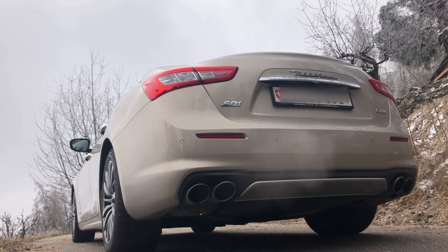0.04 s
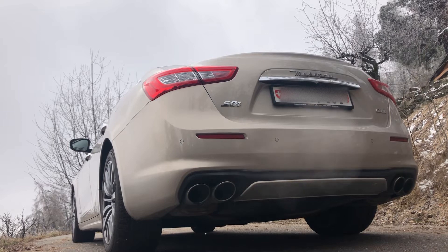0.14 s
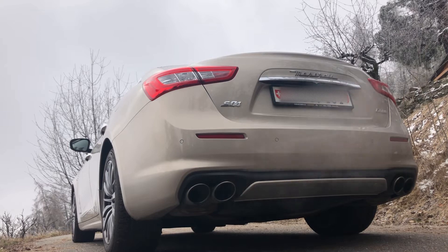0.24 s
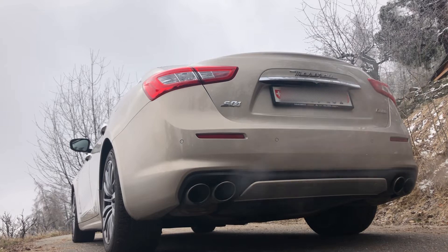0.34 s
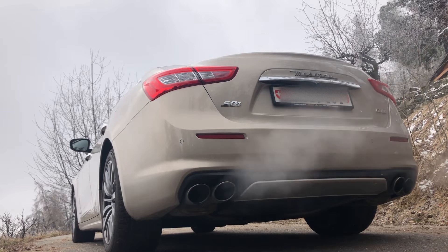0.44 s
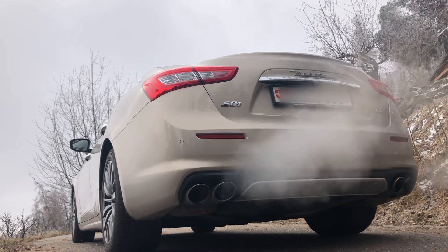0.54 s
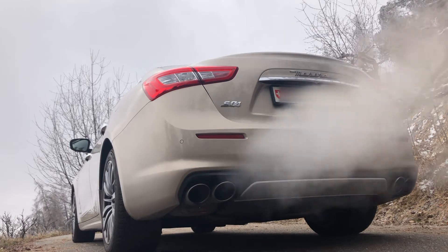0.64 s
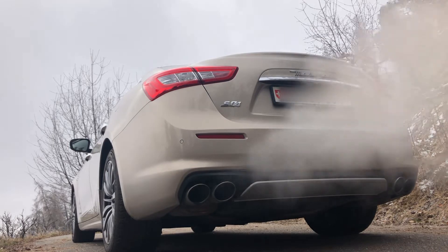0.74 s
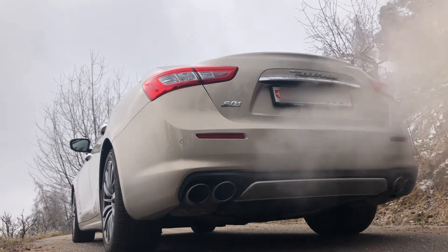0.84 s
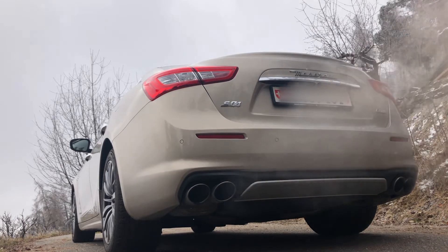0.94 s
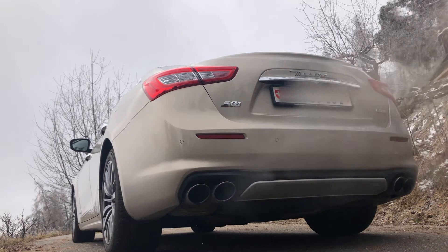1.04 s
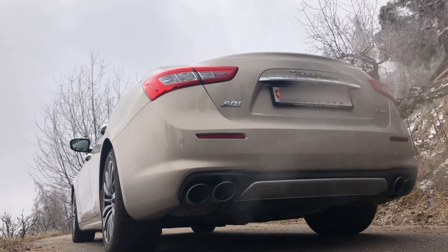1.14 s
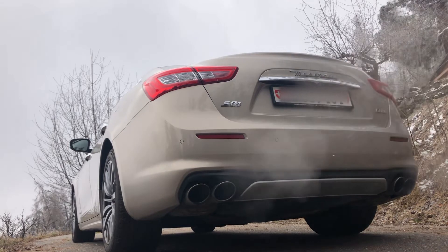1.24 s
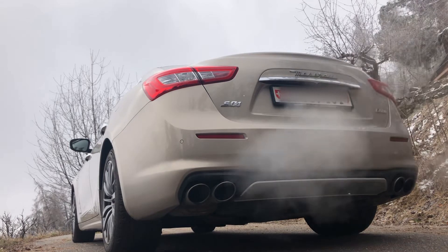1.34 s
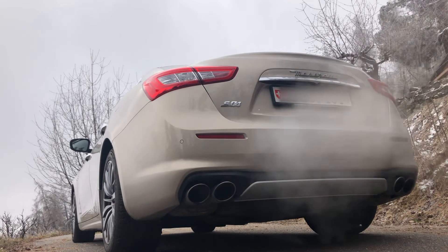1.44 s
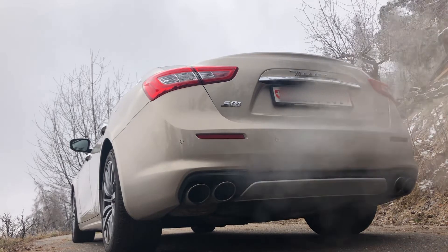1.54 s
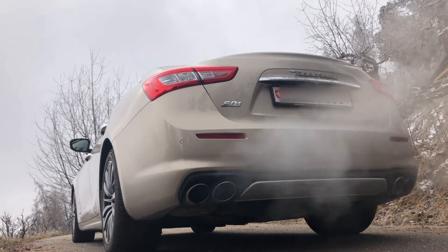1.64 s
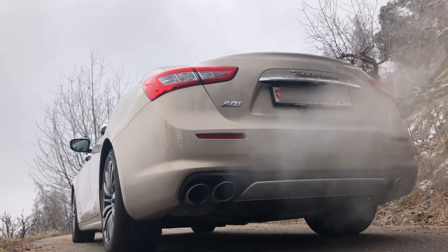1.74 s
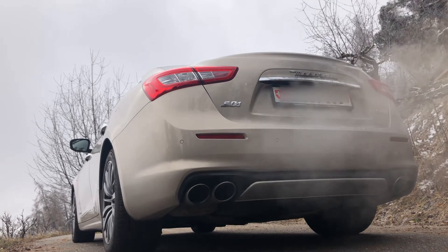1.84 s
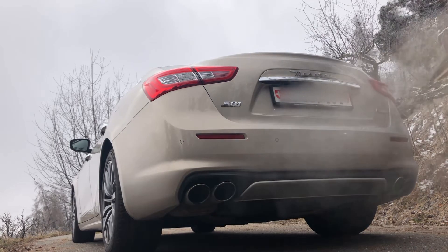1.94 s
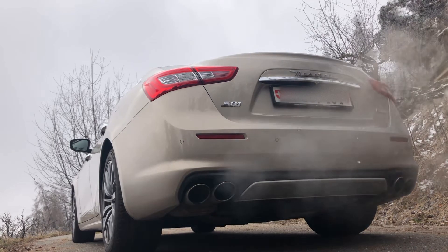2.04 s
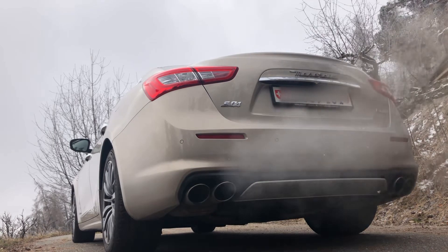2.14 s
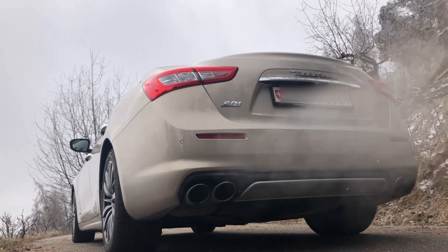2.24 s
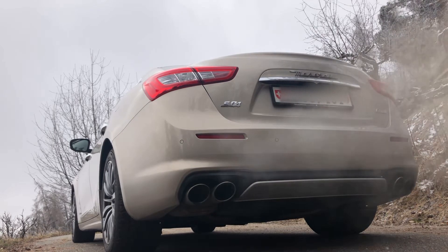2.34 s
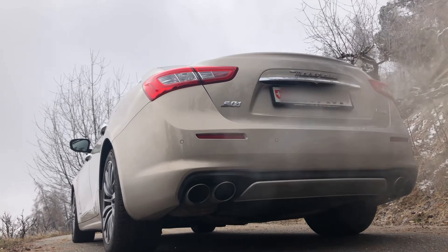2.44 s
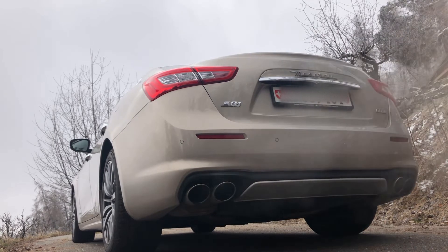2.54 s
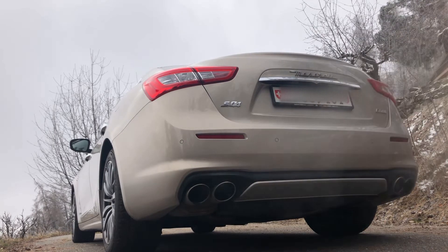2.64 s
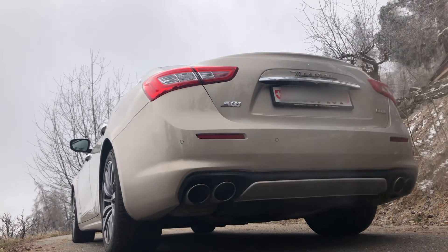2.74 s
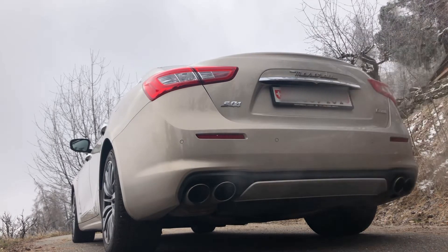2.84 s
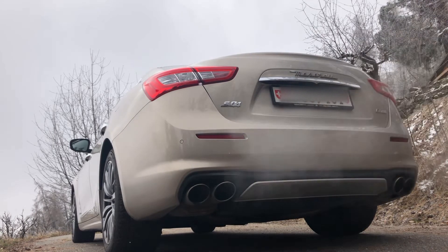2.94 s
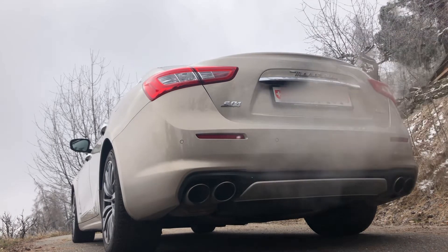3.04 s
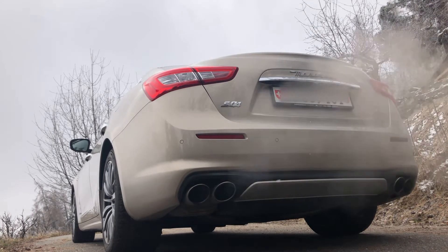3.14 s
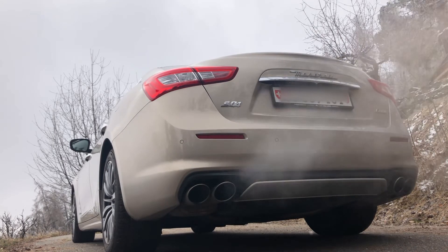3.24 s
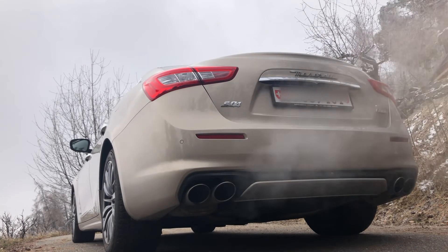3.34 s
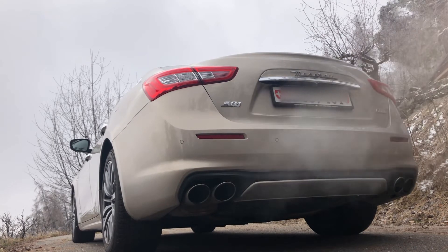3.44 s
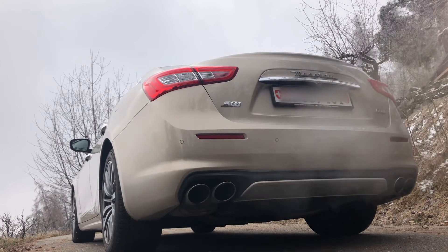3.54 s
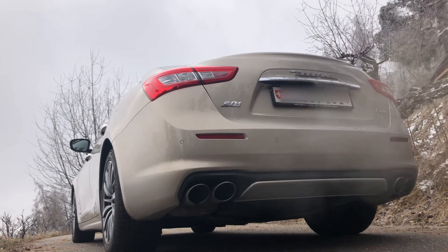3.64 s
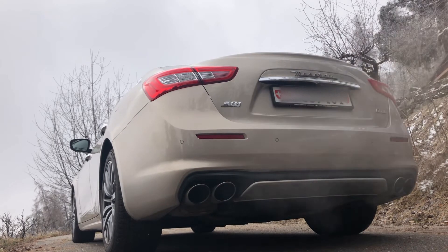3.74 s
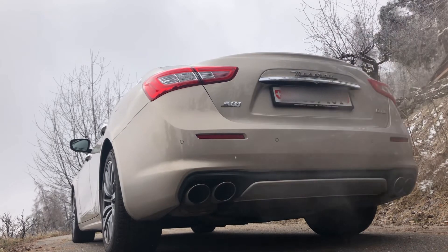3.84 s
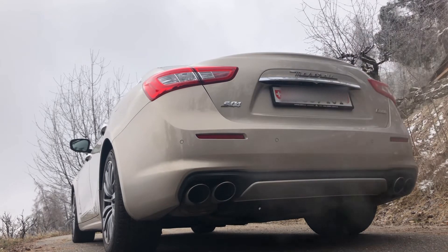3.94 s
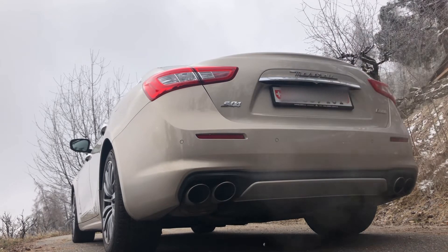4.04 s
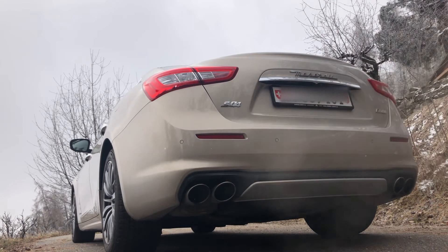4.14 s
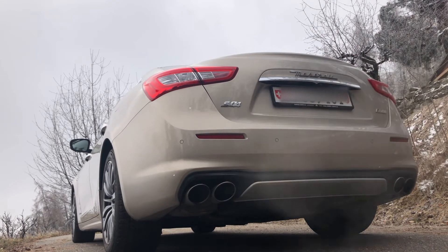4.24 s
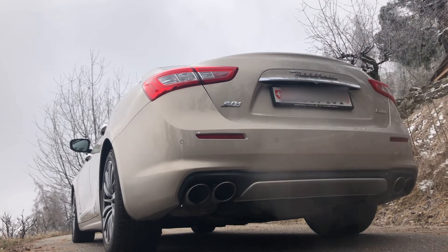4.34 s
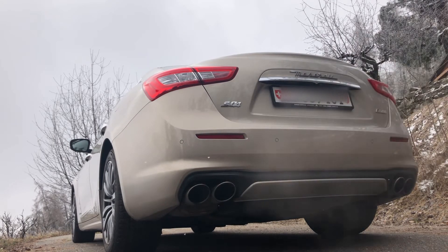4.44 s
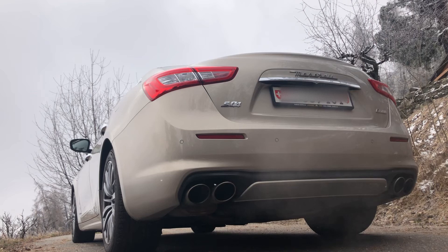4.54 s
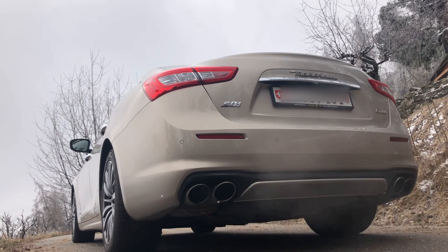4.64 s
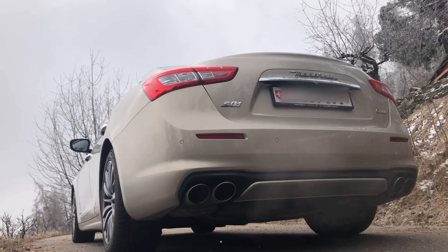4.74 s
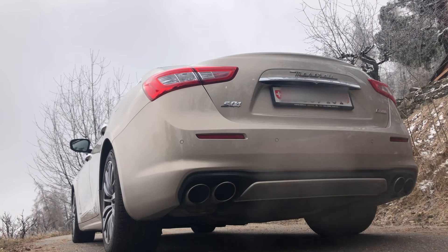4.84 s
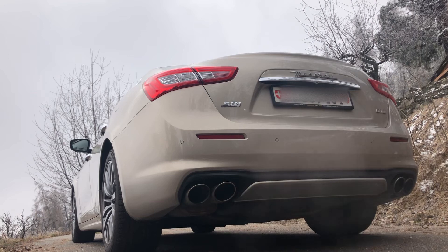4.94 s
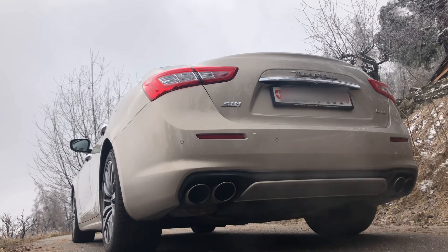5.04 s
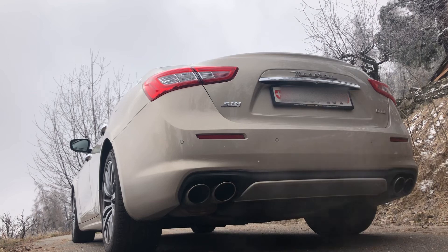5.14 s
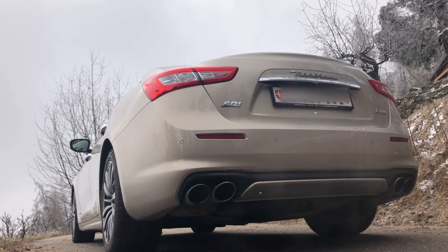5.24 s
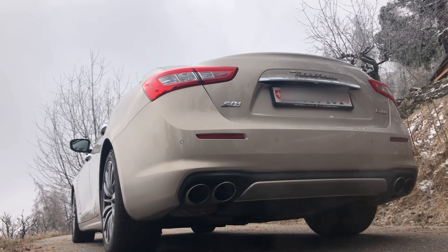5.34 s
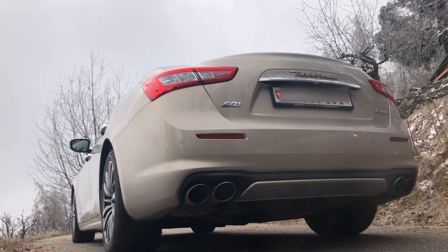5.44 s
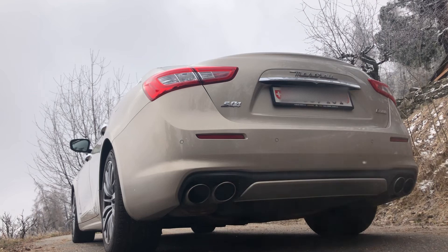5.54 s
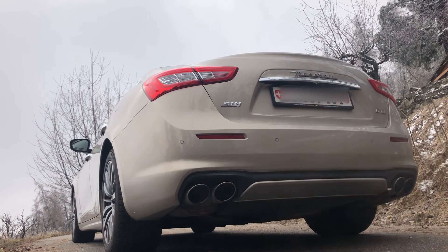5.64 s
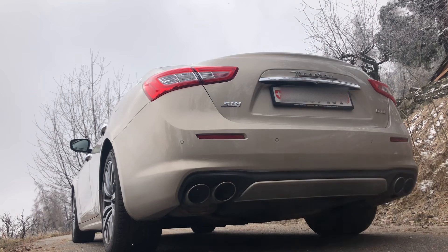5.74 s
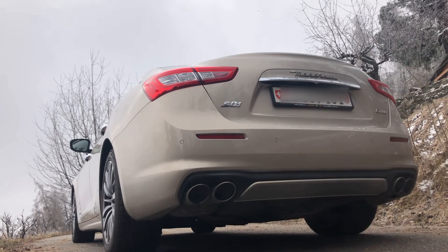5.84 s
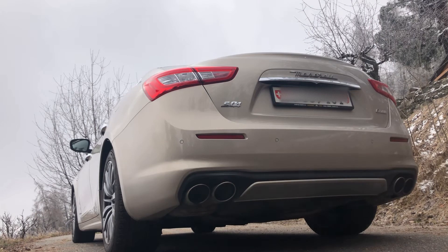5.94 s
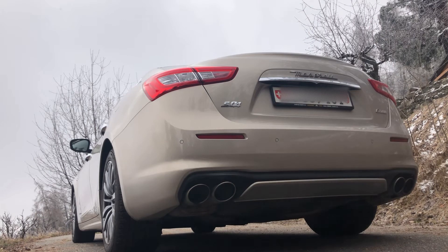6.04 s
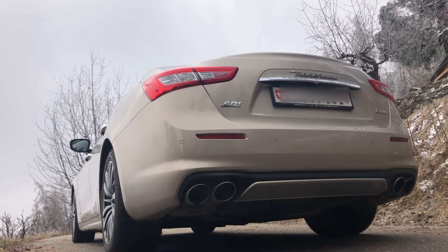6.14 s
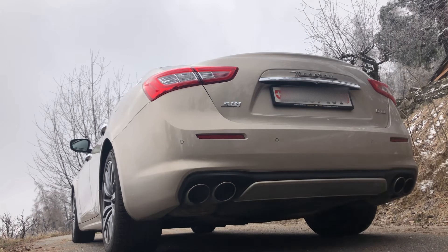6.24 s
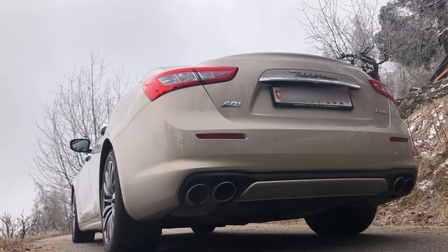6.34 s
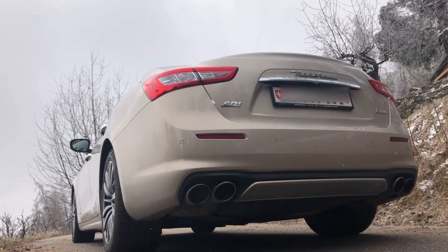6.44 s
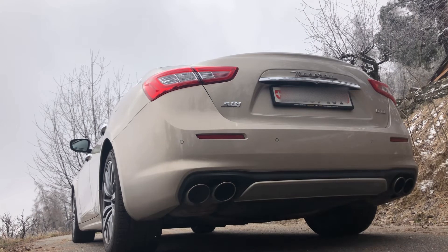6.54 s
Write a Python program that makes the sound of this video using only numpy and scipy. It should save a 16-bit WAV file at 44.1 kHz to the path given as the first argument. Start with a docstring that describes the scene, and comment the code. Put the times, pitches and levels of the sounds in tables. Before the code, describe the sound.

A sports car revs hard four times with crackling exhaust pops, then winds down slowly and settles into a deep idle.

```python
"""On an open road, microphone just behind the tailpipes of a V6 sports car.
Four blips of the throttle, a long run-down, then idle. Cylinder pulses ring the exhaust; under load
the pipe wave steepens into crackling shocks. Each lift-off pops, and the first three also stutter
with misfires. With the fuel cut the engine only pumps air and burbles, until it catches again with
a deep boom. The turbo whistles behind the exhaust, and the roadside sends back a short, dull echo."""
import sys
import numpy as np
from scipy import signal
from scipy.fft import rfft, irfft
from scipy.io import wavfile
from scipy.ndimage import uniform_filter1d

SR = 44100
rng = np.random.default_rng(int(sys.argv[2]) if len(sys.argv) > 2 else 0)


def write(x):
    x = np.atleast_2d(x).T
    wavfile.write(sys.argv[1], SR, np.round(np.clip(x, -1, 1) * 32767).astype(np.int16))


N = 291060
T = np.arange(N) / SR

# Levels in the tables are relative. Engine speed in Hz counts four-stroke cycles a second.
# Throttle blips. Each row: opening and shutting in seconds, starting speed in Hz, exponential growth
# per second, top speed in Hz, strain at the top from 0 to 1, extra level of the coast after it in dB.
BLIPS = [(-.2, 0.674, 14.62, 1.494, 38.93, 0.5, 3), (1.129, 1.66, 31.46, 1.05, 42.37, 0.79, 2),
         (1.957, 2.406, 37.03, .901, 42.38, 1, -0.5), (2.792, 3.228, 36, 1.07, 42.57, 0.92, 0)]
# The engine runs down and catches at idle. Each row: time in seconds, speed in Hz.
RUN_DOWN = [(3.6, 36.56), (4.0, 30.88), (4.5, 24.9), (5.0, 19.67), (5.4, 15.77), (5.7, 12.63),
            (5.87, 10.45), (5.95, 11.55), (6.15, 11.2), (6.7, 12.42)]
# Cylinders in firing order, banks alternating.
# Each row: burning level in dB, burning lag in ms, pumping level in dB, pumping lag in ms.
CYLINDERS = [(-3, 0.35, 9, -0.27), (0, 0.17, 3, 0.53), (-1.5, 0.37, 3.1, -0.019), (0, 0.032, 7.5, -0.51),
             (-2, .15, 10.5, -0.47), (2, 0.053, -5.5, 0.5)]
# The turbo's whistle. Each row: time in seconds, pitch in Hz, level in dB.
TURBO_GLIDE = [(0, 6400, -42), (.15, 5600, -37), (.3, 5200, -32.5), (.5, 5250, -27.5), (.75, 5300, -52),
               (3.3, 7100, -67), (3.8, 6700, -52.5), (4.25, 5350, -53.5), (4.6, 5200, -57), (5, 4800, -78)]
# Slugs of gas as the throttle opens or shuts. Each row: start in seconds, level in dB, rise in seconds.
GAS_SLUGS = [(0.663, -8.5, 0.022), (1.12, -21.5, 0.033), (1.532, -17, 0.047), (1.576, -18, 0.033),
             (1.674, -23, 0.02), (1.961, -24, 0.021), (2.264, -13.5, 0.048), (2.403, -23, 0.031),
             (2.8, -27, .032), (3.224, -17, 0.027)]
# How strongly the pipes boom. Each row: engine speed in Hz, level at the rate of one bank in dB,
# level at the firing rate in dB when coasting, the same when burning.
BOOM_LEVELS = [(10.91, -54, -13, -15), (11.9, -48, -16, -10.5), (14, -36, -20, -7), (16.02, -21, -19, 8),
               (19.8, -32, -26.5, -25.5), (25.7, -39.5, -52, -19.5), (29, -47.5, -45, -32),
               (41.7, -56, -82, -47)]
# Unburnt fuel going off in the pipe. Each row: time in seconds, crack level in dB, thud level in dB.
FUEL_POPS = [(.621, 0, -22), (0.6443, -2.5, -12), (0.6713, -3.5, 1), (1.5604, -3.5, 2), (1.5793, -1, -3),
             (1.5992, -3.5, 1.5), (1.956, -16, -6.5), (2.0087, -5.5, -22), (2.034, -4.5, -14),
             (2.2719, -0.5, -0.5), (2.2988, -3, -6), (2.323, -1.5, -2), (2.37, -4, -2.5),
             (2.4132, -9, -8.5), (2.4168, -7.5, -3.5), (2.8361, -8.5, -20), (2.8802, -8.5, -29),
             (3.0514, -9, -17), (3.1458, 0, 0.5), (3.1932, -8.5, -7), (3.2294, -16, -2.5)]
# Firings that fail. Each row: centre in seconds, half length in seconds, dip in dB.
MISFIRES = [(.655, 0.002, -13), (0.671, 0.0042, -18), (1.552, 0.0069, -15.5), (2.265, 0.008, -15),
            (2.287, 0.0039, -21), (2.347, 0.0079, -12), (2.4, .007, -23)]
# Hard firings, one a cycle as the idle takes hold. Each row: time in seconds, boost in dB.
HARD_FIRINGS = [(6.183, 5.5), (6.271, 4.5), (6.359, 6)]
# Reflections inside the silencer. Each row: delay in seconds, share of the pulse.
BAFFLE_ECHOES = [(.0029, 0.16), (.0057, 0.11), (.0086, 0.28)]

# Resonances and broad peaks of the exhaust. Each row: centre in Hz, width in Hz, level in dB.
PIPE_MODES = [(66.2, 37, -11.5), (93.5, 50, -12), (148.2, 47, -8.5), (250.6, 58, -16), (350.1, 36, 0.9),
              (430, 66, -2), (519, 85, 3.5), (569, 82, 1), (642, 60.8, 3.5), (700, 59, -4)]  # pipes and silencer
BARK_BAND = [(674.4, 150, 2.5)]  # the band that hard pulses stress
TAILPIPE_MODES = [(1091, 259, -6), (1126, 98, -2.5), (1453, 69, -1.1), (1584, 152, -3), (2052, 177, -13.5),
                  (2340, 575, -23.5)]
OUTLET_MODES = [(3080, 226, -5), (3350, 88, -8.5), (3653, 130, -9.5), (4260, 430, -11), (4640, 200, -2.5),
                (5220, 250, -6.5), (5830, 590, -15.5)]  # cross modes of the outlets
HISS_PEAKS = [(3147, 236, 0.5), (4080, 450, -3), (5150, 970, 1), (6080, 950, -5)]  # rushing gas
FIZZ_PEAKS = [(8180, 3200, 15), (10630, 2200, 15.7), (15100, 2500, 10.3)]  # its highest treble

# Pipe tone, rasp, crackle and fizz with the throttle open. Each row: level at the reference speed in dB,
# slope in dB per Hz of speed, change at full strain in dB, change just after opening in dB.
THROTTLE_LEVELS = [(-11, 0, -1.5, -2), (-17.5, 0.09, -2.5, -4), (-27, 0.35, 8.5, -13), (-43.5, 0, 26, -14)]
# The same four layers at idle. Each row: level as the fuel returns in dB, level once settled in dB.
IDLE_LEVELS = [(-22, -12.5), (-44.5, -28.5), (-53, -37.5), (-60, -46.5)]
# Pipe tone, rasp, hiss and fizz with the fuel cut.
# Each row: level at high speed in dB, level at low speed in dB, boost in the late rush of air in dB.
COAST_LEVELS = [(-23, -28, 3.5), (-37, -39.5, 3), (-45.5, -51, 6), (-53.5, -61.5, 11.5)]

TORQUE_LAG_S, LIFT_LEAD_S, FLYWHEEL_S = .04, .021, .118
CATCH_S, SETTLE_S = 5.905, .63  # fuel returns, and the idle builds up to full strength
PRESSURE_S = .063  # the treble waits for pressure to build in the pipes
STRAIN_KNEE_HZ, STRAIN_FADE_S = 1.1, .17  # strain sets in this close to top speed, then eases
ROAR_HZ, ROAR_WIDTH_HZ, ROAR_DB = 37.5, 3, 2  # the pipes resonate best at this engine speed
CLIMB_LOAD, IDLE_LOAD = 3.3, .9  # load hardens the pulses; it is greatest pulling up from low speed
COAST_HIGH_HZ, COAST_LOW_HZ = 28.27, 18.8  # the flow dies down between these speeds
RUSH_S, RUSH_WIDTH_S = 5.473, .21  # a rush of air swells once, late in the run-down
NULL_HZ, NULL_WIDTH_HZ = 15.8, .74  # at this speed the firing-rate boom cancels and flips sign


def undb(db):
    """Decibels to gain."""
    return 10 ** (np.asarray(db) / 20)


def bell(x, centre, width):
    """A rounded hump of height 1."""
    return np.exp(-((x - centre) / width) ** 2)


def curves(table, at):
    """A table's later columns, joined by straight lines along its first."""
    knots, *columns = np.transpose(table)
    return [np.interp(at, knots, column) for column in columns]


def noise():
    """White noise of unit power."""
    return rng.standard_normal(N)


def smooth(x, seconds):
    """Rounded moving average."""
    size = max(int(seconds * SR), 1)
    return uniform_filter1d(uniform_filter1d(x, size), size)


def decay(x, seconds):
    """Gives every impulse an exponential tail."""
    return signal.lfilter([1], [1, -np.exp(-1 / (seconds * SR))], x)


def steady(x):
    """Unit power over a few engine cycles; single pulses keep their relative size."""
    return x / np.sqrt(np.abs(smooth(x * x, seconds=.06)) + 1e-14)


def ring(x, modes, size=8192):
    """Causal filter with steep-sided resonances."""
    f = np.arange(size // 2 + 1) * SR / size
    power = sum((undb(db) / (1 + ((f - hz) / width) ** 2) ** 1.5) ** 2 for hz, width, db in modes)
    cepstrum = irfft(np.log(power) / 2)
    cepstrum[1:size // 2] *= 2  # minimum phase: the ringing follows the pulse
    cepstrum[size // 2 + 1:] = 0
    response = irfft(np.exp(rfft(cepstrum)))
    return signal.fftconvolve(x, response)[:N]


def clicks(times, sizes):
    """Impulses, each shared between two neighbouring samples."""
    at = np.clip(times * SR, 0, N - 2)
    i = at.astype(int)
    return np.bincount(i, sizes * (1 - at + i), N) + np.bincount(i + 1, sizes * (at - i), N)


def roadside(x, wet_db=-19, t60=.46):
    """Farther off, the earth bank and trees scatter a short, dull echo back to the microphone."""
    age = T[:SR // 2]
    dull = signal.lfilter(*signal.butter(1, 3000, fs=SR), rng.standard_normal(len(age)))
    tail = dull * undb(-60 * age / t60) * (age > .008)
    return x + undb(wet_db) * signal.fftconvolve(x, tail / np.linalg.norm(tail))[:N]


def turbo(width_hz=700):
    """Behind the exhaust, the turbine's breathy whistle glides with its speed."""
    hz, db = curves(TURBO_GLIDE, T)
    waver = steady(smooth(noise(), 1 / width_hz))
    return undb(db) * np.sqrt(2) * waver * np.cos(2 * np.pi * np.cumsum(hz) / SR)


def thumps(thump_hz=58, flutter_db=-5, trim_db=-7.5):
    """A slug of gas rocks the silencer at its lowest mode, with a low flutter."""
    flutter = undb(flutter_db) * steady(ring(noise(), [(75, 29, 13), (140, 41, -27)]))
    out = np.zeros(N)
    for start, db, rise in GAS_SLUGS:
        age = np.maximum(T - start, 0)
        swell = age / rise * np.exp(1 - age / rise)
        out += undb(db + trim_db) * swell * (np.sin(2 * np.pi * thump_hz * age) + flutter)
    return out


def boom(turn, speed, burn, lead_rad=.43, overtone_db=-6, overtone_lead_rad=1.555, idle_hz=13.5):
    """The gas flow swells just before each pulse, most at low speed; idle firings sharpen its crest."""
    bank_db, coasting_db, burning_db = curves(BOOM_LEVELS, speed)
    null = np.tanh((NULL_HZ - speed) / NULL_WIDTH_HZ)
    firing = undb(burn * burning_db + (1 - burn) * coasting_db) * null
    angle = 2 * np.pi * len(CYLINDERS) * turn
    idle = smooth(burn * (speed < idle_hz), seconds=.098)
    crest = np.cos(angle + lead_rad) + idle * undb(overtone_db) * np.cos(2 * angle + overtone_lead_rad)
    return np.sqrt(2) * (undb(bank_db) * np.cos(angle / 2) + firing * crest)


def pops():
    """Unburnt fuel goes off: a crack at the outlets, right by the microphone, and a thud in the pipe."""
    times, crack_db, thud_db = np.transpose(FUEL_POPS)
    snap = clicks(times, -undb(crack_db))
    crack = snap + undb(-13) * decay(snap, seconds=.0022) * noise()
    thud = ring(clicks(times, -undb(thud_db)), PIPE_MODES)
    return (undb(21) * ring(crack, OUTLET_MODES) + undb(26.5) * ring(crack, TAILPIPE_MODES)
            + undb(-22.5) * ring(crack, FIZZ_PEAKS) + undb(33) * thud)


def reaches_top(opens, start, growth, top):
    """The moment at which a blip arrives at its top speed."""
    return opens + TORQUE_LAG_S + np.log(top / start) / growth


def engine_speed(points=8):
    """Each blip climbs exponentially and holds; friction slows it and the flywheel rounds the corners."""
    corners = []
    for opens, shuts, start, growth, top, _, _ in BLIPS:
        times = np.linspace(opens + TORQUE_LAG_S, reaches_top(opens, start, growth, top), points)
        corners += [*zip(times, np.geomspace(start, top, points)), (shuts - LIFT_LEAD_S, top)]
    padded_time = np.arange(-SR, N + SR) / SR
    speed = np.interp(padded_time, *np.transpose(corners + RUN_DOWN))
    return smooth(speed, FLYWHEEL_S)[SR:SR + N]


def fuel():
    """1 while fuel burns, 0 while it is cut."""
    on = sum((T > opens) & (T < shuts) for opens, shuts, *_ in BLIPS) + (T > CATCH_S)
    return smooth(1. * on, seconds=.018)


def valve_pulses(turn, pattern_db, lag_ms, uneven, scatter_db, jitter_ms):
    """A pulse as each exhaust valve opens; every cylinder has its own size and delay."""
    count = len(CYLINDERS)
    i = np.flatnonzero(np.diff(np.floor(turn * count)))
    cylinder = np.arange(len(i)) % count
    chance = rng.standard_normal((len(i), 2))
    late = (lag_ms[cylinder] + jitter_ms * chance[:, 0]) / 1000
    uneven, scatter_db = (np.broadcast_to(c, N)[i] for c in (uneven, scatter_db))
    sizes = undb(uneven * pattern_db[cylinder] + scatter_db * chance[:, 1])
    return steady(clicks(T[i] + late, -sizes))


def puffs(pulses, seconds):
    """Turbulence that follows each pulse and dies away."""
    return steady(decay(np.abs(pulses), seconds) * noise())


def silencer(x, depth):
    """Each pulse returns a few times from the silencer's baffles."""
    return x + depth * sum(share * np.interp(T - delay, T, x, left=0) for delay, share in BAFFLE_ECHOES)


def coast_levels(speed):
    """Levels of tone, rasp, hiss and fizz, which hold at high speed and sink as the engine slows."""
    extra_db = np.zeros(N)
    for _, shuts, *_, coast_db in BLIPS:
        extra_db[T > shuts] = coast_db
    slow = np.clip((COAST_HIGH_HZ - speed) / (COAST_HIGH_HZ - COAST_LOW_HZ), 0, 1)
    rush = bell(T, RUSH_S, RUSH_WIDTH_S)
    return [high + (low - high) * slow + rush_db * rush + extra_db for high, low, rush_db in COAST_LEVELS]


def coasting(turn, speed):
    """Without fuel the cylinders pump air unevenly: a soft burble under smooth hiss."""
    tone_db, rasp_db, hiss_db, fizz_db = coast_levels(speed)
    _, _, pattern_db, lag_ms = np.transpose(CYLINDERS)
    revs = speed / speed.max()
    pulses = valve_pulses(turn, pattern_db, lag_ms, uneven=1, scatter_db=.7, jitter_ms=.035)
    gas = puffs(pulses, seconds=.017)
    # slow gas leaves the pipes less damped and favours their low modes
    modes = [(hz, width * .7, db - 4.7 * np.log2(max(hz / 352, 1))) for hz, width, db in PIPE_MODES]
    # as the engine slows, its pulses dissolve into the flow
    flow = silencer(pulses, depth=1.5) + undb(5 - 25 * revs) * gas
    tone = steady(ring(flow, modes))
    rasp = steady(ring(gas + undb(-1) * revs * pulses, TAILPIPE_MODES))
    rush = noise() + undb(-4) * gas
    hiss = steady(ring(rush, HISS_PEAKS))
    fizz = steady(ring(rush, FIZZ_PEAKS))
    return undb(tone_db) * tone + undb(rasp_db) * rasp + undb(hiss_db) * hiss + undb(fizz_db) * fizz


def shocks(wave, power, scatter_db):
    """The steepest falling flanks of a loud pipe wave break into sharp fronts."""
    i = np.flatnonzero((wave[:-1] > 0) & (wave[1:] <= 0))
    slope = wave[i] - wave[i + 1]
    sizes = (slope / slope.mean()) ** power * undb(scatter_db * rng.standard_normal(len(i)))
    return steady(clicks((i + wave[i] / slope) / SR, -sizes))


def burn_controls(speed, reference_hz=38):
    """Load and layer levels: dull at each opening, brighter with speed, harshest near the top."""
    opening, strain = 0, 0
    for opens, shuts, start, growth, top, top_strain, _ in BLIPS:
        held = np.maximum(T - reaches_top(opens, start, growth, top), 0)
        near_top = np.exp(np.minimum(speed - top, 0) / STRAIN_KNEE_HZ)
        strain += top_strain * near_top * np.exp(-held / STRAIN_FADE_S) * (T > opens) * (T < shuts)
        opening += np.exp(-((T - opens) / PRESSURE_S) ** 6)
    levels = [db + slope * (speed - reference_hz) + strain_db * strain + opening_db * opening
              for db, slope, strain_db, opening_db in THROTTLE_LEVELS]
    levels[0] += ROAR_DB * bell(speed, ROAR_HZ, ROAR_WIDTH_HZ)  # pipe tone only
    settled = np.clip((T - CATCH_S) / SETTLE_S, 0, 1)
    idle_levels = [first + (last - first) * settled for first, last in IDLE_LEVELS]
    after_blips = T > RUN_DOWN[0][0]
    load = np.where(after_blips, IDLE_LOAD * settled, CLIMB_LOAD * (1 - speed / speed.max()))
    return load, np.where(after_blips, idle_levels, levels)


def burning(turn, speed):
    """Firings ring the pipes; with speed the near bank stands out and the hiss turns to crackle."""
    load, (tone_db, rasp_db, crackle_db, fizz_db) = burn_controls(speed)
    pattern_db, lag_ms, _, _ = np.transpose(CYLINDERS)
    revs = speed / speed.max()
    uneven = np.clip(3.5 * revs - .65, .1, 1)
    scatter_db = 2.2 - 1.1 * revs  # combustion is lumpy at low speed and evens out as the revs rise
    pulses = valve_pulses(turn, pattern_db, lag_ms, uneven, scatter_db, jitter_ms=.04)
    gas = puffs(pulses, seconds=.006)
    flow = silencer(pulses, depth=1.6 * (1 - revs)) + undb(-2 - 7 * revs) * gas
    tone = steady(ring(flow + load * ring(flow, BARK_BAND), PIPE_MODES))
    fronts = shocks(tone, power=2.1, scatter_db=1.2)
    tailpipe_flow = revs * (silencer(pulses, depth=1) + .55 * fronts) + undb(1 - 14 * revs) * gas
    rasp = steady(ring(tailpipe_flow, TAILPIPE_MODES))
    # near the top of the revs the shocks take over from the smooth hiss
    sharp = np.clip(1.25 * revs - .35, 0, .9)
    spray = fronts + undb(-3) * puffs(fronts, seconds=.0012)
    rush = steady(noise() + undb(-1) * gas)
    hiss = steady(ring(rush, HISS_PEAKS))
    crackle = np.sqrt(sharp) * steady(ring(spray, OUTLET_MODES)) + np.sqrt(1 - sharp) * hiss
    fizz = steady(ring(sharp * spray + undb(1) * rush, FIZZ_PEAKS))
    # a failed firing ducks all four layers; a hard one thumps the pipe
    misfire_db = sum(db * bell(T, at, half_length) for at, half_length, db in MISFIRES)
    hard_db = sum(db * bell(T, at, width=.012) for at, db in HARD_FIRINGS)
    return undb(misfire_db) * (undb(tone_db + hard_db) * tone + undb(rasp_db) * rasp
                               + undb(crackle_db) * crackle + undb(fizz_db) * fizz)


def scene():
    """One microphone close behind the tailpipes, as the engine passes between burning and coasting."""
    speed = engine_speed()
    turn = .1 + np.cumsum(speed) / SR  # four-stroke cycles completed
    burn = fuel()
    exhaust = burn * burning(turn, speed) + (1 - burn) * coasting(turn, speed) + pops()
    return (roadside(exhaust + turbo()) + boom(turn, speed, burn) + thumps())[None]


def record(dry, low_cut_hz=28, ceiling=.93, top_hz=15850):
    """The deepest bass is shed, the highest peaks are rounded off, and the recorder cuts the top."""
    lean = signal.sosfilt(signal.butter(2, low_cut_hz, "high", fs=SR, output="sos"), dry)
    rounded = lean / (1 + (lean / ceiling) ** 8) ** (1 / 8)
    return signal.sosfilt(signal.ellip(10, .2, 80, top_hz, fs=SR, output="sos"), rounded)


dry = scene()
out = record(dry)
write(out)
```